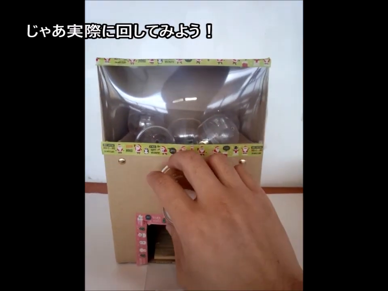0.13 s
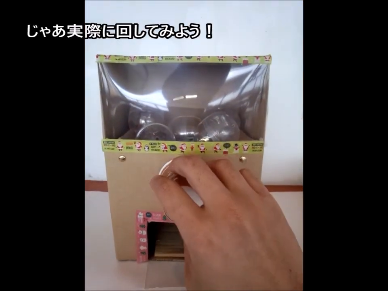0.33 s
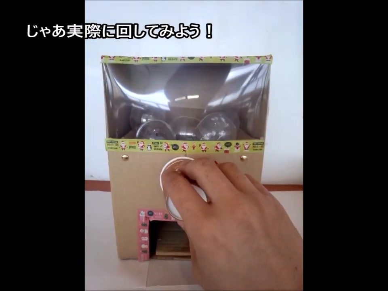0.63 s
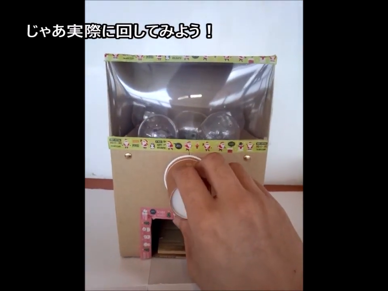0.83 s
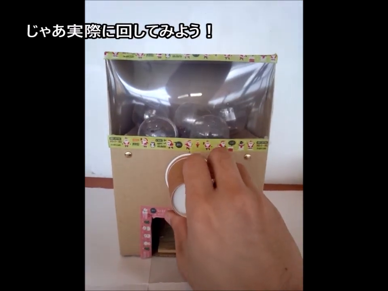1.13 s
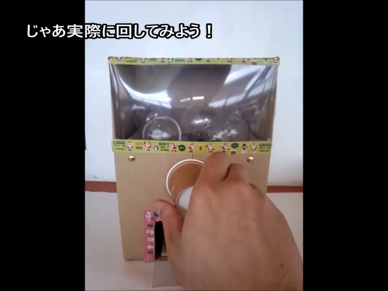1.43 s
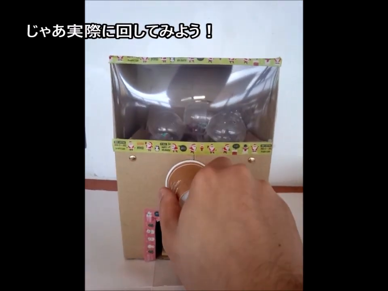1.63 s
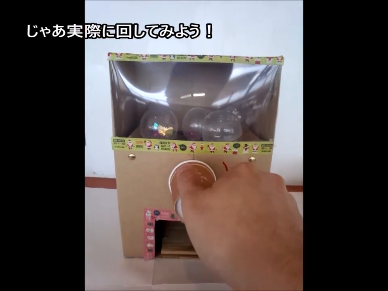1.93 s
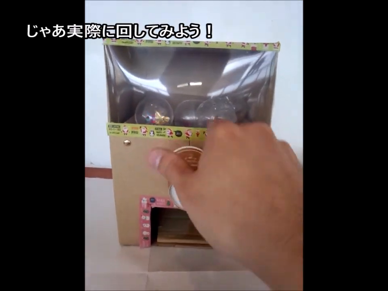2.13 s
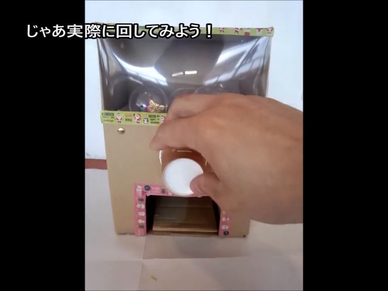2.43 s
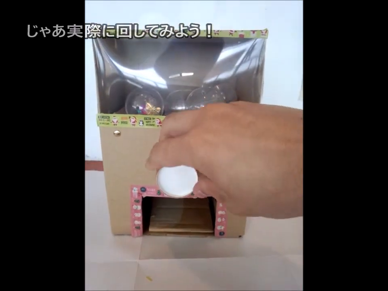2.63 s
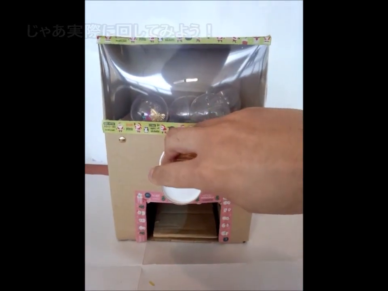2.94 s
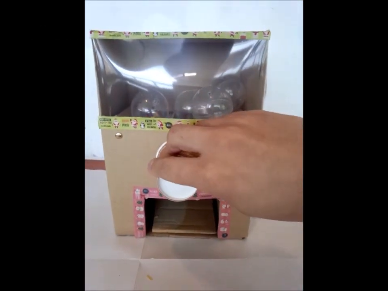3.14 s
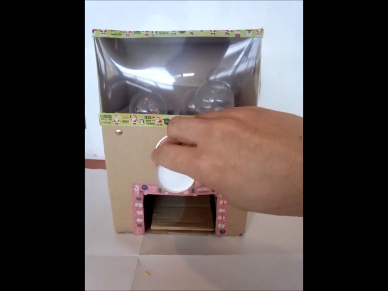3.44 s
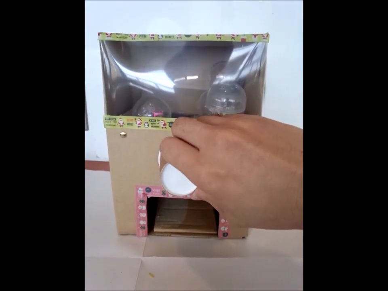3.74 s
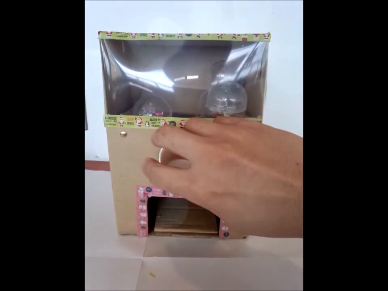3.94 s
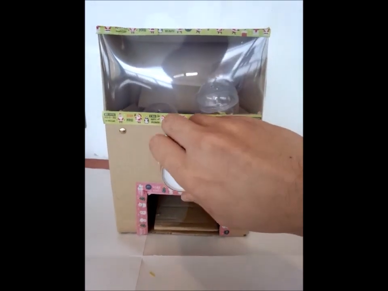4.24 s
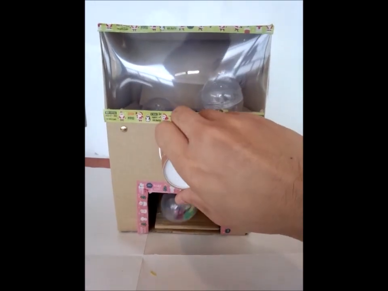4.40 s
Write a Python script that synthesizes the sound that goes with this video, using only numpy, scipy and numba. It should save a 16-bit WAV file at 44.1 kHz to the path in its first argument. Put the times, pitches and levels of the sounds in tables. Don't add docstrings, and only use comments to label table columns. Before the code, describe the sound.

In a quiet humming room, a handmade cardboard capsule machine is turned by hand. Sparse taps become a dense cluster of hollow knocks and plastic clicks with dry rubbing, then thin out. A second turn gives soft shell clicks before one capsule bounces rapidly down the chute. Close phone microphone, mono, slightly overloaded, dull top.

```python
import sys
import numpy as np
from scipy import signal
from scipy.fft import rfft, irfft
from scipy.io import wavfile
from scipy.ndimage import uniform_filter1d
from numba import njit

SR = 44100
rng = np.random.default_rng(int(sys.argv[2]) if len(sys.argv) > 2 else 0)


def decibels_to_gain(level_db):
    exponent = np.asarray(level_db, float) / 20
    return 10 ** exponent


def unload_audio(sound):
    columns = np.transpose(np.atleast_2d(sound))
    steps = np.round(np.clip(columns, -1, 1) * 32767)
    wavfile.write(sys.argv[1], SR, steps.astype(np.int16))


N = 201492

# frequency_hz, density_db (per Hz)
ROOM_SPECTRUM = [(20, -2), (50, 2), (115, 2), (165, -8), (310, -13), (420, -18), (630, -18), (1000, -24),
                 (1600, -23), (2500, -19), (3200, -24.5), (5000, -32), (7500, -36), (9000, -50)]
# start_s, peak_db, pitch_hz
TABLE_BUMPS = [
    (1.156, -31, 116),
    (1.6, -30, 109),
    (1.77, -30.5, 190),
    (1.809, -26.5, 59),
    (2.032, -28.5, 106.5),
    (2.184, -32, 166),
    (4.441, -29, 110),
]
# pitch_hz, level_db, t60_s
BOX_MODES = [(330, -10.5, 0.041), (476, -17, 0.054), (592, -7.5, 0.068), (696, -16.5, 0.076),
             (746, -46, 0.021)]
# pitch_hz, level_db, t60_s
PANEL_MODES = [(1220, -46, 0.015), (1420, -19, 0.052), (1644, -13, 0.034), (2052, -10, 0.026),
               (2385, -12, 0.059), (2610, -9.5, 0.028), (2790, -22.5, 0.016)]
# pitch_hz, level_db, t60_s
SHELL_MODES = [(3300, -18.5, 0.021), (3900, -4, 0.013), (4450, -13.5, 0.063), (5080, -9, 0.021),
               (5900, -10, 0.008), (6240, -21.5, 0.0064), (6900, -17.5, 0.045), (7860, -40, .01)]
# time_s, drag_on_card_db, capsules_rolling_db (relative to the drag)
DRUM_TURN = [(0.62, -80, -14), (0.73, -51.5, -14), (1.13, -58, 0), (1.17, -56.5, 15), (1.36, -50, -10),
             (1.5, -46.5, -6), (1.729, -43.5, -3), (1.834, -27.5, -2), (1.889, -41, -7.5),
             (1.99, -36, -0.5), (2.15, -49, 0), (2.374, -52.5, 5), (2.75, -57, 2.5), (3.4, -56, -7),
             (3.6, -54.5, -4.5), (3.67, -49, 0.5), (4.3, -57, 5), (4.569, -43.5, -5)]
# time_s, share rubbing
RUB_S, RUB_SHARE = [.6, .65, 2.72, 2.78, 3.17, 3.22], [0, 1, 1, 0, 0, 1]
# start_s, peak_db, shell_hz
HEAP_CLICKS = [(1.1534, -14.5, 3650), (1.1698, -25.5, 6180), (1.2129, -26.5, 4650), (1.2394, -37, 3520),
               (1.4242, -30, 3500), (1.4391, -28.5, 4670), (1.4631, -25, 3300), (1.48, -30, 5000),
               (1.6583, -32, 3550), (1.6791, -18.5, 3560), (1.737, -30, 3660), (1.759, -30, 3600),
               (1.7684, -14, 3730), (1.79, -18, 3900), (1.8128, -19.5, 3680), (1.935, -15, 3550),
               (1.9646, -15, 4710), (2.0157, -19, 4200), (2.1819, -28, 3420), (2.312, -27, 4400),
               (2.3268, -18.5, 4000), (2.359, -26.5, 3700), (2.3774, -23.5, 4460), (2.685, -33, 3360),
               (3.2056, -34, 3700)]
# start_s, peak_db, shell_hz
RIDE_CLICKS = [(3.6122, -35.5, 4480), (3.656, -25.5, 4320), (3.68, -35, 4480), (3.693, -26.5, 4480),
               (3.722, -30, 4450), (3.7638, -26, 4330), (3.775, -30.5, 4200), (3.7954, -43, 4340),
               (3.8322, -28.5, 4050), (3.8507, -35.5, 4070)]
# start_s, peak_db, shell_hz
SETTLE_CLICKS = [(3.9494, -25.5, 3770), (3.9663, -27.5, 3550), (4.0398, -27.5, 4870), (4.0667, -29, 3520),
                 (4.147, -37, 3890), (4.1973, -26.5, 3920), (4.279, -25, 3900), (4.523, -12, 6880),
                 (4.5456, -9, 6700)]
# start_s, peak_db, shell_hz
CHUTE_CLICKS = [
    (4.4353, -11.5, 4560),
    (4.4453, -0.5, 4420),
    (4.4511, 5.5, 4840),
    (4.4624, -6.5, 4370),
    (4.479, -9, 4430),
    (4.4888, -8, 4450),
    (4.4938, -9, 4600),
    (4.5086, -11.5, 4640),
    (4.5243, -14, 4540),
]
# start_s, peak_db, thud_hz, panel_hz
SQUARE_KNOCKS = [(0.663, -34, 347, 1220), (1.299, -21, 296, 1430), (1.47, -21.5, 403, 1470),
                 (1.567, -29, 297, 1370), (1.593, -22, 301, 1420), (1.656, -12.5, 575, 1220),
                 (1.665, -16, 560, 1270), (1.711, -27, 301, 1440), (1.733, -32, 570, 1420),
                 (1.818, -8.5, 584, 2740), (1.825, -11.5, 736, 2840), (1.897, -15, 290, 1500),
                 (1.975, -16, 620, 1420), (2.002, -22, 710, 1380), (2.083, -28, 298, 1450),
                 (3.446, -32.5, 463, 1630), (3.683, -29, 634, 1450), (4.209, -17.5, 645, 1560),
                 (4.292, -22.5, 398, 2380), (4.371, -19.5, 315, 1530), (4.431, -21, 393, 1060),
                 (4.529, -21, 633, 1410)]
# start_s,
# peak_db, panel_hz, contact_ms
FLAP_SNAPS = [(0.286, -35, 1220, 1.7), (0.866, -21.5, 1420, 1.3), (1.642, -32, 1500, 1.2),
              (1.758, 1, 2610, 6.7), (1.983, -13.5, 1460, 5.9), (2.059, -22.5, 1490, 3.3),
              (2.182, -10.5, 2130, 2.5), (2.212, -42, 2100, 1.6), (2.63, -18, 2040, 0.26),
              (2.683, -22, 2550, 0.43), (4.264, -24, 2660, 7.2), (4.345, -30, 1510, 5),
              (4.358, -27, 1550, 3)]
# start_s, peak_db, thud_hz, contact_ms
LANDINGS = [(0.761, -24.5, 457, 0.97), (1.158, -9, 700, 1.4), (1.76, -6.5, 313, 3), (1.315, -27, 380, 2.7),
            (1.482, -18.5, 580, 3.3), (1.534, -23.5, 512, 3.3), (1.603, -31, 659, 1.4),
            (1.679, -3.5, 415, 1.76), (1.836, -34, 326, 2.7), (1.964, -9, 754, 5.2), (2.027, -18, 635, 2.7),
            (2.119, -29, 380, 3), (2.342, -35.5, 344, 8.4), (3.281, -18.5, 377, 1.8),
            (3.972, -33.5, 298, 5), (4.442, -5, 474, 2.24), (4.487, -18, 476, 1.05)]
# start_s, peak_db, thud_hz, panel_hz, panel_share_db
HARD_BLOWS = [(1.153, -1.5, 650, 1370, -4), (1.767, 0.5, 725, 2790, -2), (1.791, -5.5, 320, 1530, -2),
              (1.812, -9.5, 630, 1500, 0), (1.935, 0.5, 570, 1515, -1), (2.016, -9.5, 700, 1450, -5.5),
              (2.184, -5.5, 782, 2598, -1), (2.185, -8.5, 330, 1220, -0.5), (4.255, -16, 404, 1650, -4),
              (4.278, -9.5, 766, 1655, -0.7), (4.427, -12.5, 436, 1094, -3.5)]
THINNED_S = [.195, .37, .435, .475, .52, .6, .73, .82, .97, 1.115, 1.54, 1.67, 1.722, 2.39, 2.78, 3.035,
             3.18, 3.27, 3.89, 4.01, 4.19]
# centre_s, length_s, lowest_emptied_hz
DEEP_THINNED = [
    (1.362, .04, 3200),
    (3.325, .035, 2800),
    (3.45, .07, 3500),
    (4.415, .014, 1600),
]

ROOM_DB, OFFSET, TOP_HZ = -41.4, -.136, 7703
BUMP_T60_S, TAIL_T60_S = 0.14, .3
PANEL_DRAG_DB, PANEL_DRAG_SLOPE, FIRM_DRAG_DB = 2.5, 0.95, -37.5
HEAP_T60_S, RIDE_T60_S, SETTLE_T60_S, CHUTE_T60_S = .022, .03, .018, .02
TICK_CONTACT_MS, RIDE_CONTACT_MS, FREE_RING_DB = 2.1, 6, 5
WALL_PANEL_DB, WALL_CONTACT_MS = -1.5, 2.45
FLAP_PANEL_DB, FLAP_THUD_HZ = -.1, 320
LANDING_PANEL_DB, LANDING_PANEL_HZ = -8, 1450
HARD_CONTACT_MS = 2.2
BOX_RING_T60_S, BOX_RING_DB = .036, .3
PANEL_RING_T60_S, PANEL_RING_DB = .024, 3
CRACK_SHARE_OF_T60 = .45
THINNED_LENGTH_S, THINNED_EDGE_HZ = .022, 4300


def level(x, db):
    return x * decibels_to_gain(db) / np.sqrt(np.mean(x ** 2))


def band(x, lo_hz, hi_hz):
    return signal.sosfilt(signal.butter(2, [lo_hz, hi_hz], "band", fs=SR, output="sos"), x)


def walk(rate_hz):
    k = int(SR / rate_hz)
    steps = np.repeat(rng.standard_normal(N // k + 1), k)
    drift = uniform_filter1d(uniform_filter1d(steps, k), k)[:N]
    return drift / drift.std()


def ring(hz, db, t60, seconds=0.13):
    t = np.arange(int(seconds * SR)) / SR
    hz, db, t60 = (np.asarray(v)[..., None] for v in (hz, db, t60))
    decay = np.exp(-np.log(1000) * t / np.maximum(t60, .004))
    return np.sum(decibels_to_gain(db) * decay * np.sin(2 * np.pi * hz * t), axis=-2)


def struck(modes, own_hz, own_t60, scatter_db, detune, crack_db, own_db):
    hz, db, t60 = np.transpose(modes)
    chance = rng.standard_normal((len(own_hz), 2, len(hz)))
    shared = ring(hz * (1 + detune * chance[:, 0]), db + scatter_db * chance[:, 1], t60)
    crack = ring(hz * 1.066, db + crack_db, CRACK_SHARE_OF_T60 * t60)
    own_db = np.broadcast_to(own_db, own_hz.shape)
    own = ring(own_hz[:, None], own_db[:, None], own_t60[:, None])
    return shared + crack + own


def scuffle(rings, ms, spread, soft_ms):
    t_ms = np.arange(1024) * 1000 / SR
    age = t_ms / np.clip(ms, .3, 8)[:, None]
    chatter = spread * rng.standard_normal((len(rings), 1024)) ** 3 * np.sqrt(age) * np.exp(-age)
    chatter[:, 0] += 1
    push = t_ms[:128] * np.exp(-t_ms[:128] / soft_ms)
    hits = signal.fftconvolve(rings, chatter, axes=1)
    hits = signal.fftconvolve(hits, push[None], axes=1)
    return hits / np.abs(hits).max(axis=1, keepdims=True)


def place(times, hits):
    out = np.zeros(N + hits.shape[1])
    for s, hit in zip(times, hits):
        k = int(s * SR)
        out[k:k + len(hit)] += hit
    return out[:N]


@njit
def follow(x, attack, release):
    out, e = np.empty(len(x)), 0.
    for i in range(len(x)):
        e += (x[i] - e) * (attack if x[i] > e else release)
        out[i] = e
    return out


def room():
    hz, db = np.transpose(ROOM_SPECTRUM)
    f = np.maximum(np.fft.rfftfreq(N, 1 / SR), 1)
    air = rfft(rng.standard_normal(N)) * decibels_to_gain(np.interp(np.log(f), np.log(hz), db))
    octave, out = np.log2(f / 20), 0
    for centre in np.arange(0, 10):
        weight = np.clip(1 - abs(octave - centre), 0, 1)
        out = out + decibels_to_gain(1.1 * walk(9)) * irfft(air * weight, N)
    return level(out, ROOM_DB)


def pressure_drift():
    return level(band(rng.standard_normal(N), 2, 13), -44)


def bumps():
    s, db, hz = np.transpose(TABLE_BUMPS)
    return place(s, ring(hz[:, None], db[:, None], BUMP_T60_S, seconds=.2))


def drag():
    t, out = np.arange(N) / SR, 0
    s, drag_db, rolling_db = np.transpose(DRUM_TURN)
    panel_db = FIRM_DRAG_DB + PANEL_DRAG_DB + PANEL_DRAG_SLOPE * (drag_db - FIRM_DRAG_DB)
    rubbing = np.interp(t, RUB_S, RUB_SHARE)
    bodies = ((BOX_MODES, drag_db, .5), (PANEL_MODES, panel_db, .4), (SHELL_MODES, drag_db + rolling_db, .6))
    for modes, db, t60_share in bodies:
        hz, mode_db, t60 = np.transpose(modes)
        spots = ring(hz * np.array([[.97], [1], [1.03]]), mode_db, t60_share * t60)
        fits_db = np.array([3.5 * walk(70) for _ in spots])
        slip_db = 2.5 * rng.exponential(size=(3, N)) + fits_db
        slips = rng.standard_normal((3, N)) * decibels_to_gain(slip_db)
        body = signal.fftconvolve(slips, spots, axes=1)[:, :N].sum(axis=0)
        out = out + rubbing * decibels_to_gain(np.interp(t, s, db)) * level(body, 0)
    return out


def ticks():
    groups = ((HEAP_CLICKS, HEAP_T60_S, 0, TICK_CONTACT_MS),
              (RIDE_CLICKS, RIDE_T60_S, FREE_RING_DB, RIDE_CONTACT_MS),
              (SETTLE_CLICKS, SETTLE_T60_S, 0, TICK_CONTACT_MS),
              (CHUTE_CLICKS, CHUTE_T60_S, FREE_RING_DB, TICK_CONTACT_MS))
    rows = [(*row, *setting) for clicks, *setting in groups for row in clicks]
    s, db, shell_hz, t60, own_db, ms = np.transpose(rows)
    shells = struck(SHELL_MODES, shell_hz, t60, 1.1, 0.054, 0.1, own_db)
    return place(s, decibels_to_gain(db)[:, None] * scuffle(shells, ms, 0.1, 0.0048))


def knocks():
    rows = [(s, db, thud, panel, WALL_PANEL_DB, WALL_CONTACT_MS) for s, db, thud, panel in SQUARE_KNOCKS]
    rows += [(s, db, FLAP_THUD_HZ, panel, FLAP_PANEL_DB, ms) for s, db, panel, ms in FLAP_SNAPS]
    rows += [(s, db, thud, LANDING_PANEL_HZ, LANDING_PANEL_DB, ms) for s, db, thud, ms in LANDINGS]
    rows += [(*row, HARD_CONTACT_MS) for row in HARD_BLOWS]
    s, db, thud_hz, panel_hz, panel_db, ms = np.transpose(rows)
    box = struck(BOX_MODES, thud_hz, BOX_RING_T60_S + 0 * s, 1.8, 0.023, 0.1, BOX_RING_DB)
    thud = scuffle(box, ms, 0.15, 0.075)
    panels = struck(PANEL_MODES, panel_hz, PANEL_RING_T60_S + 0 * s, 3.2, 0.036, 0.86, PANEL_RING_DB)
    panel = scuffle(panels, ms, 0.1, 0.035)
    share = np.clip(decibels_to_gain(panel_db), .03, .99)[:, None]
    return place(s, decibels_to_gain(db)[:, None] * (np.sqrt(1 - share ** 2) * thud + share * panel))


def reflections(near):
    t = np.arange(SR // 4) / SR
    decay = np.exp(-np.log(1000) * t / TAIL_T60_S) * np.clip(t / 0.018, 0, 1)
    tail = band(rng.standard_normal(len(t)), 140, 6400) * decay
    return signal.fftconvolve(near, tail / np.sqrt(np.sum(tail ** 2)))[:N]


def scene():
    near = band(knocks(), 247, 7600) + ticks()
    background = room() + pressure_drift()
    return (near + decibels_to_gain(-21) * reflections(near) + bumps() + drag() + background)[None]


def thin_out(x):
    f, t, z = signal.stft(x, SR, nperseg=512, noverlap=384)
    gaps = [(s, THINNED_LENGTH_S, THINNED_EDGE_HZ) for s in THINNED_S] + DEEP_THINNED
    for s, length, edge_hz in gaps:
        chance = .3 + .35 * np.arange(86) / 31
        empty = np.repeat(rng.random(86) < chance, 3)[:len(f)] & (f > edge_hz)
        z[np.ix_(empty, abs(t - s) < length / 2)] *= .05
    return signal.istft(z, SR, nperseg=512, noverlap=384)[1][:N]


def low_pass(x):
    return signal.sosfilt(signal.butter(12, 8650, fs=SR, output="sos"), x)


def record(dry):
    bright = follow(np.abs(band(dry[0], 3200, 5000)), 1 / (0.0038 * SR), 1 / (.12 * SR))
    gain = (1 + (bright / decibels_to_gain(-25.0)) ** 2) ** -.15
    ceiling = .56
    x = ceiling * np.tanh((dry + OFFSET) * gain / ceiling) - OFFSET
    x = signal.sosfilt(signal.ellip(8, .3, 70, TOP_HZ, fs=SR, output="sos"), x)
    mix = thin_out(x[0])[None] + OFFSET
    return low_pass(mix)


dry = scene()
out = record(dry)
unload_audio(out)
```